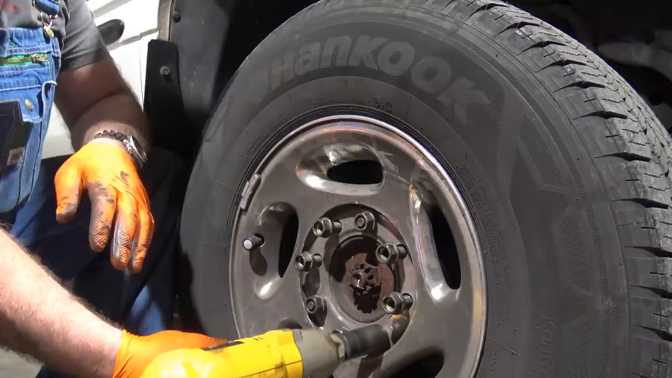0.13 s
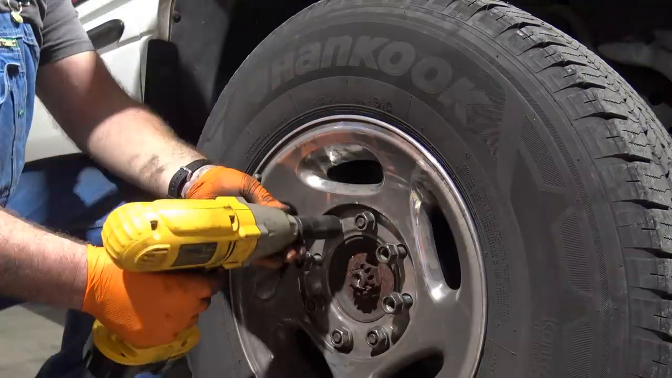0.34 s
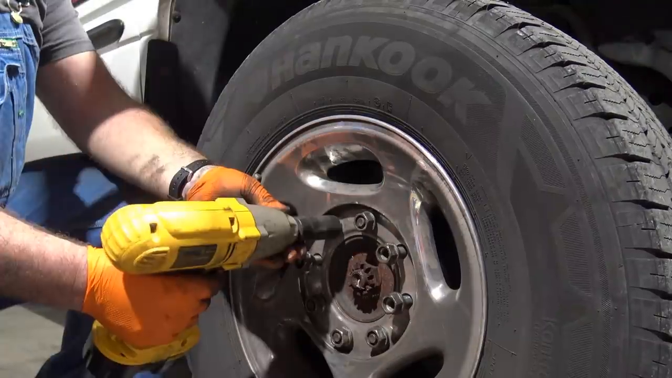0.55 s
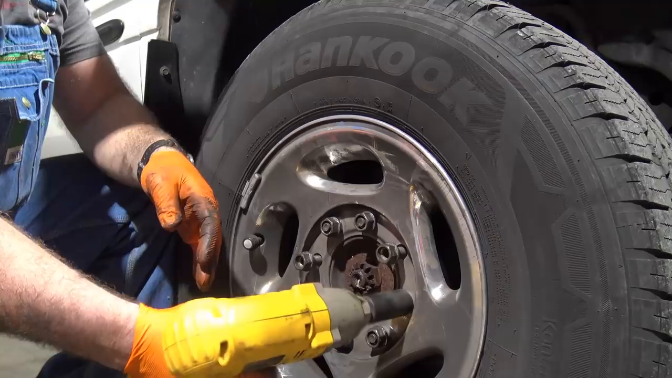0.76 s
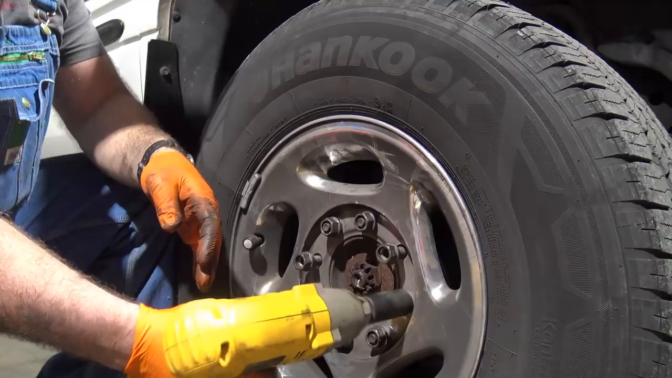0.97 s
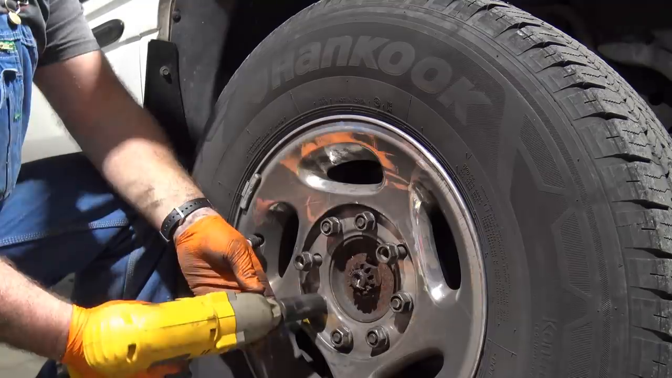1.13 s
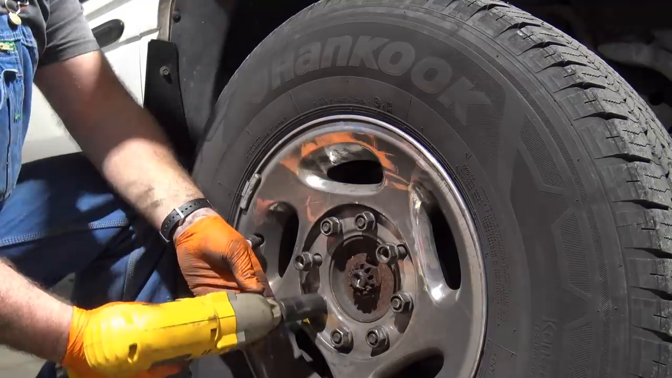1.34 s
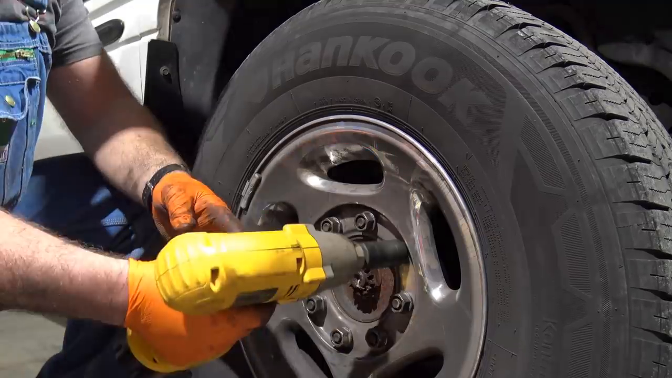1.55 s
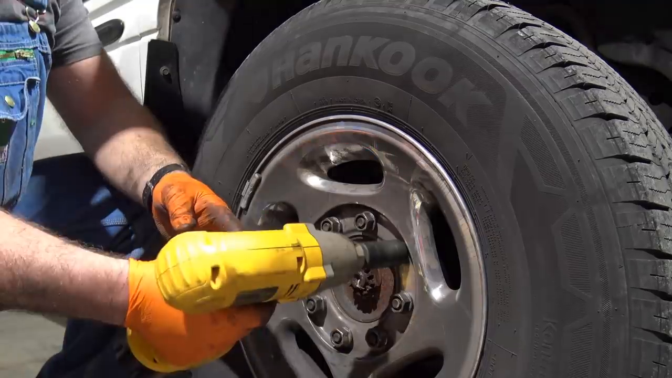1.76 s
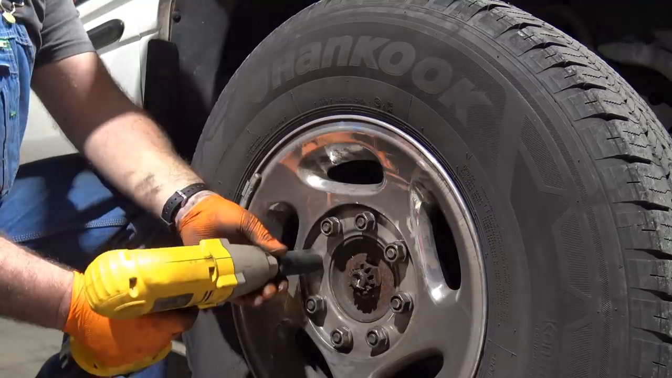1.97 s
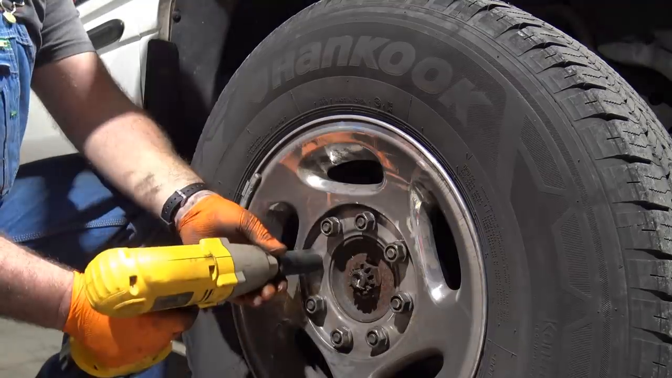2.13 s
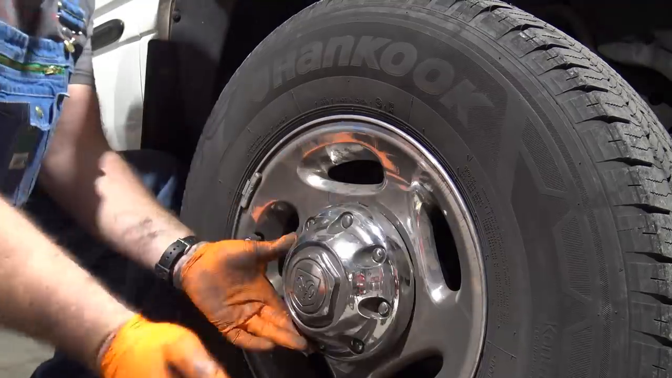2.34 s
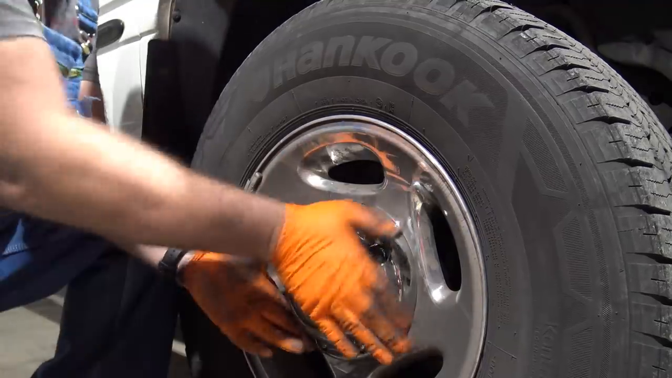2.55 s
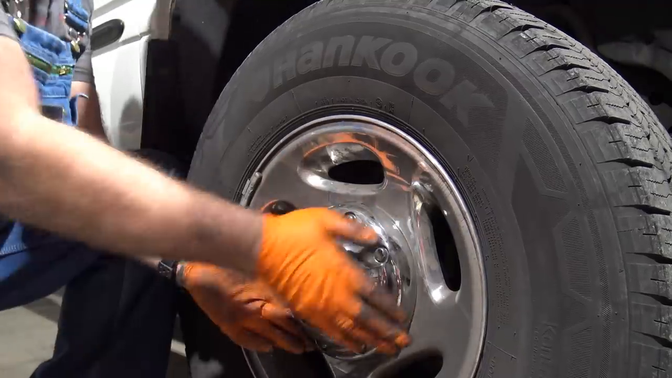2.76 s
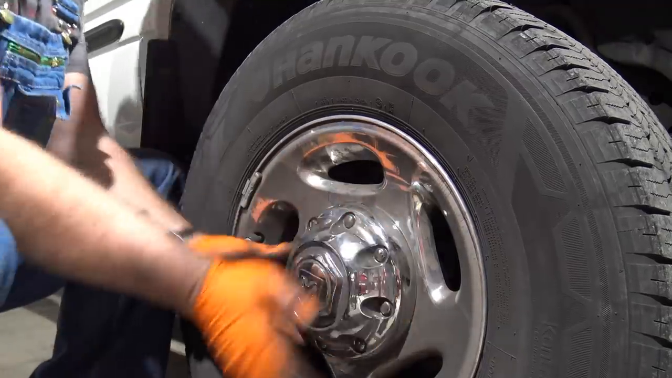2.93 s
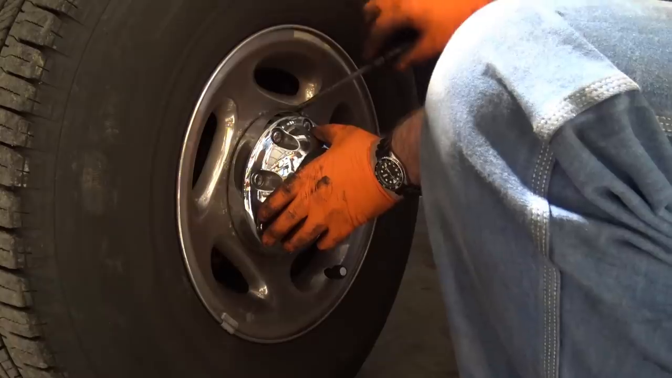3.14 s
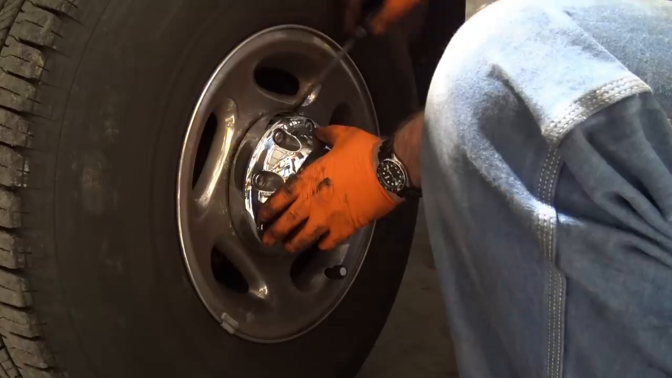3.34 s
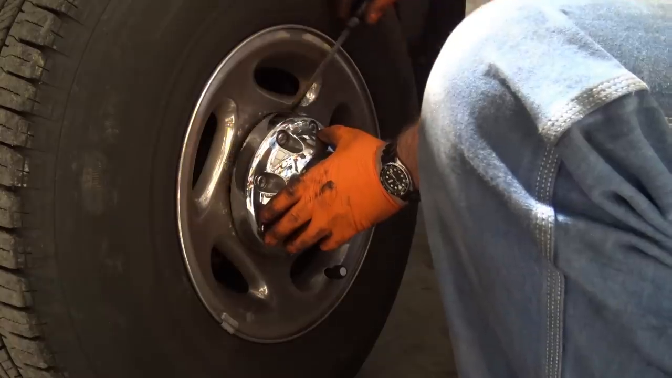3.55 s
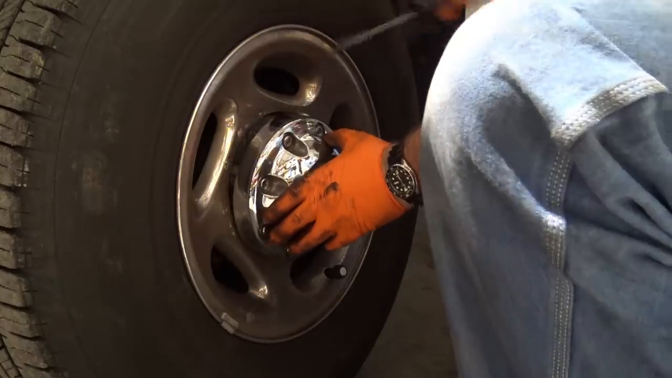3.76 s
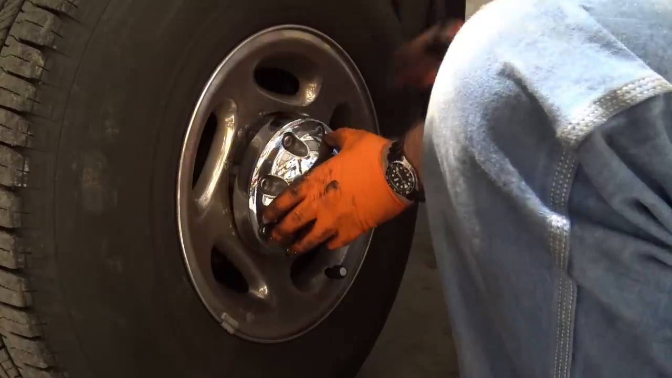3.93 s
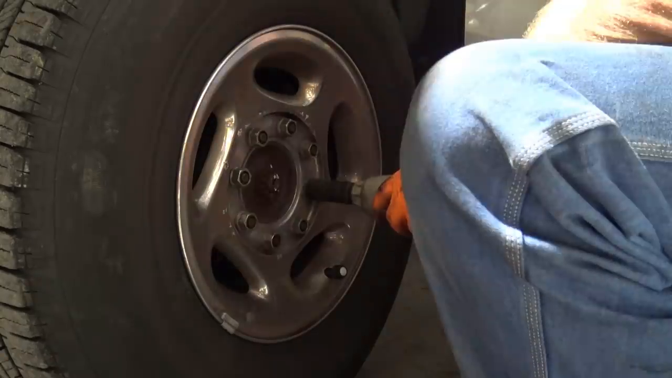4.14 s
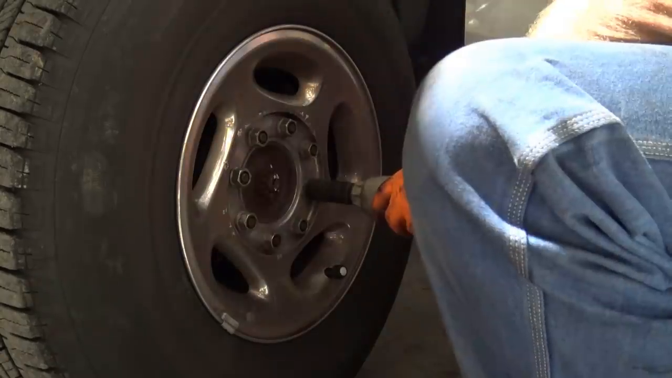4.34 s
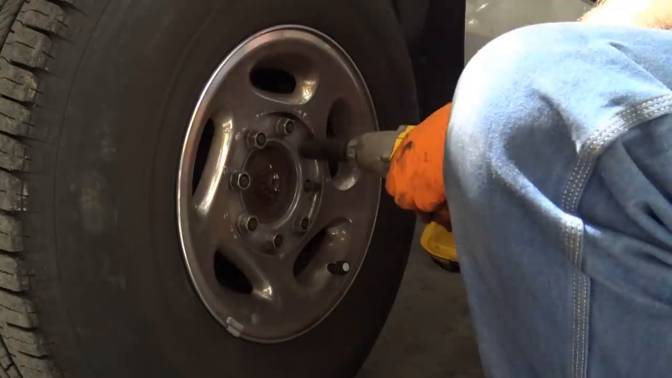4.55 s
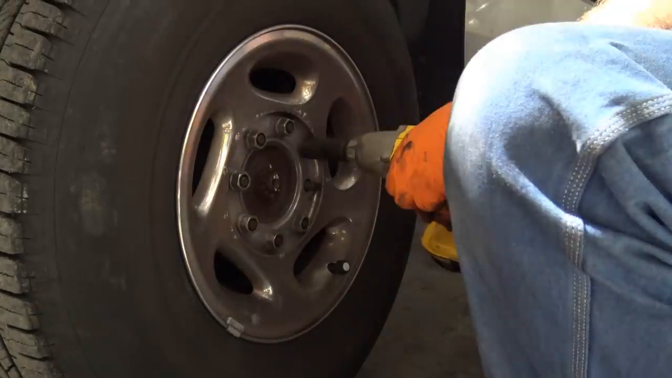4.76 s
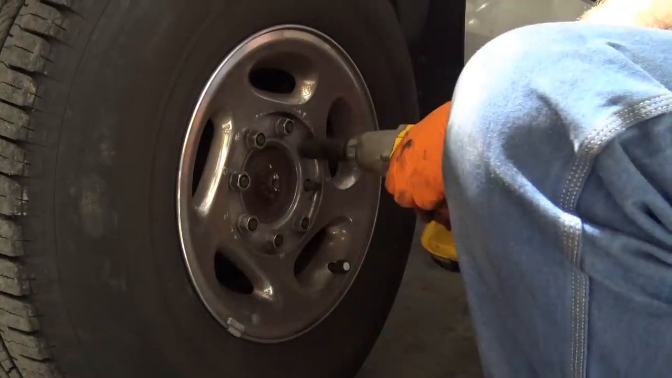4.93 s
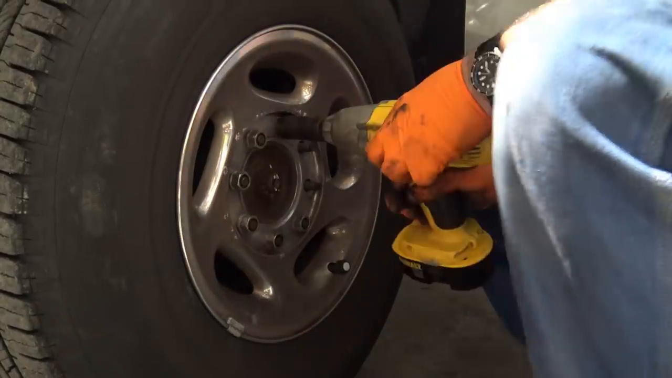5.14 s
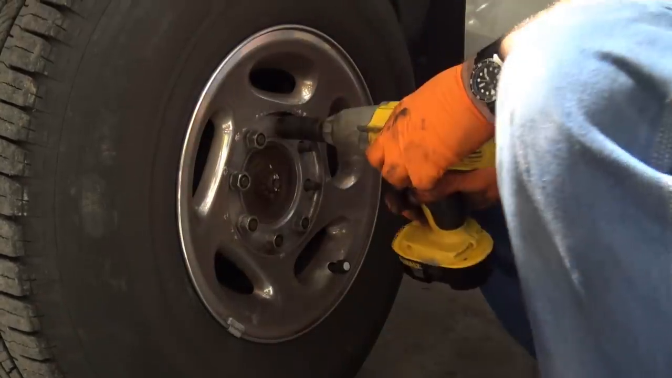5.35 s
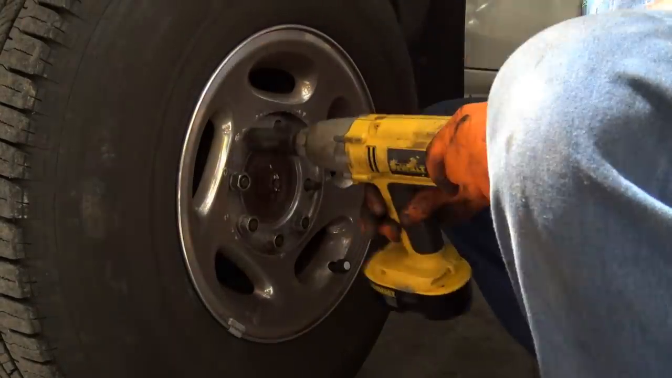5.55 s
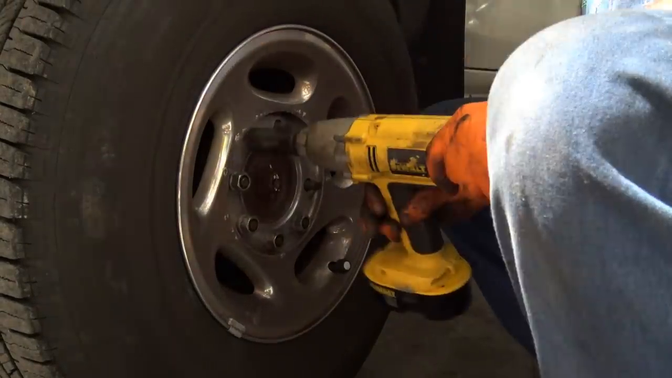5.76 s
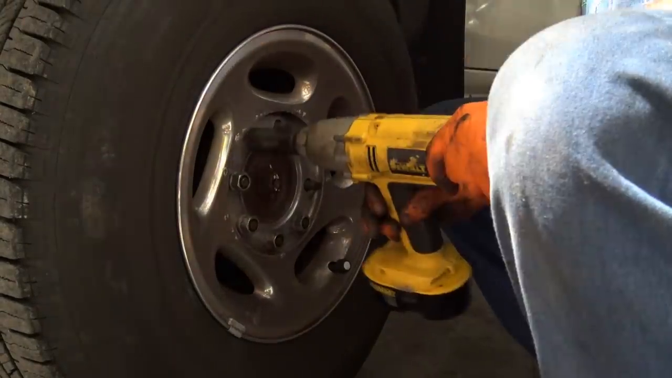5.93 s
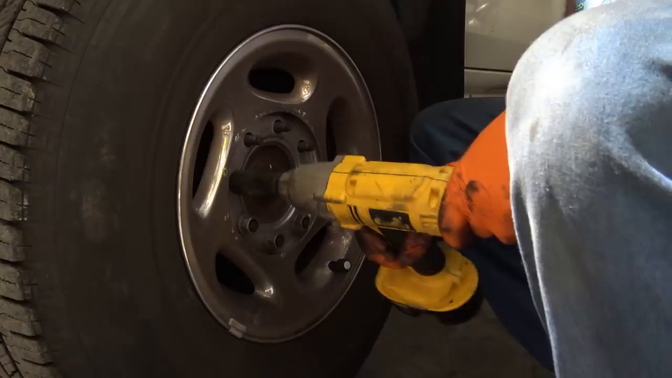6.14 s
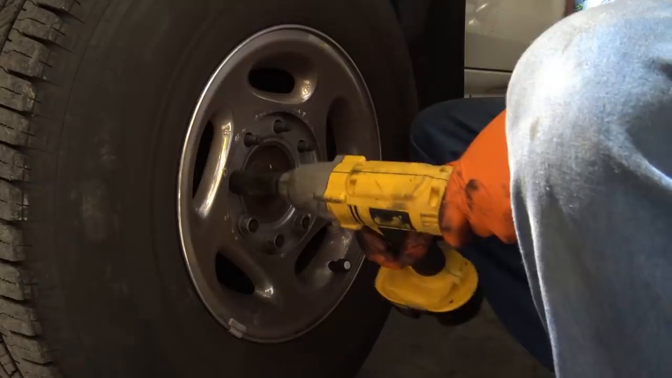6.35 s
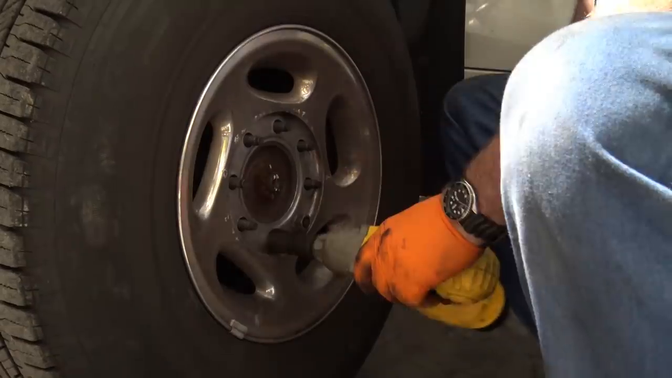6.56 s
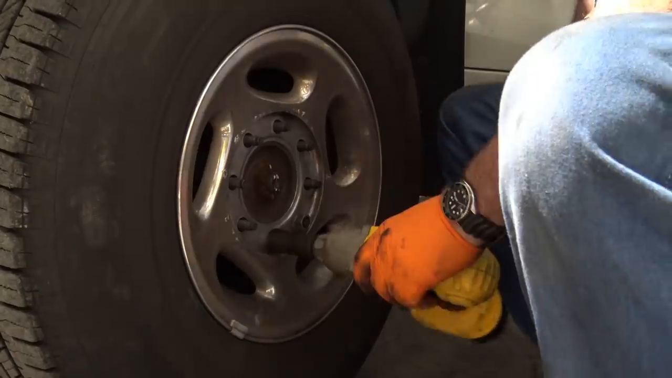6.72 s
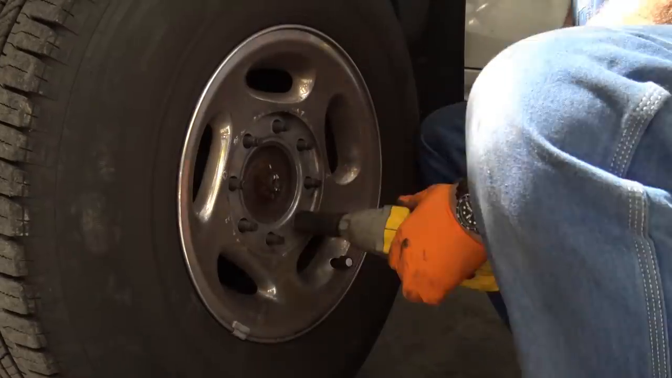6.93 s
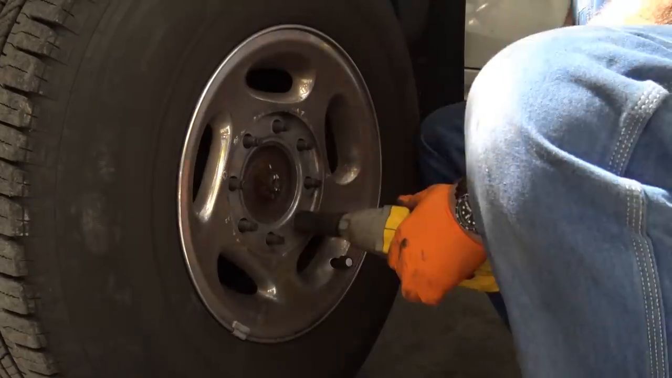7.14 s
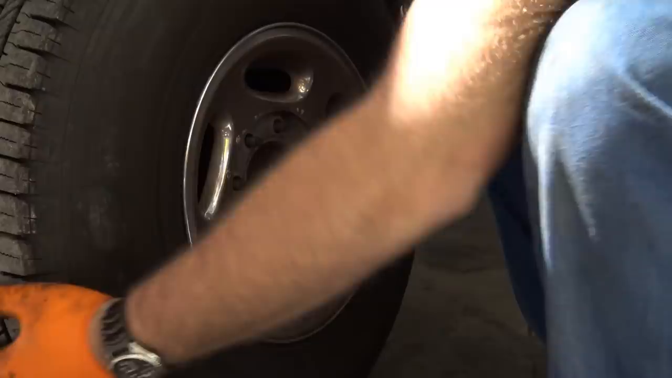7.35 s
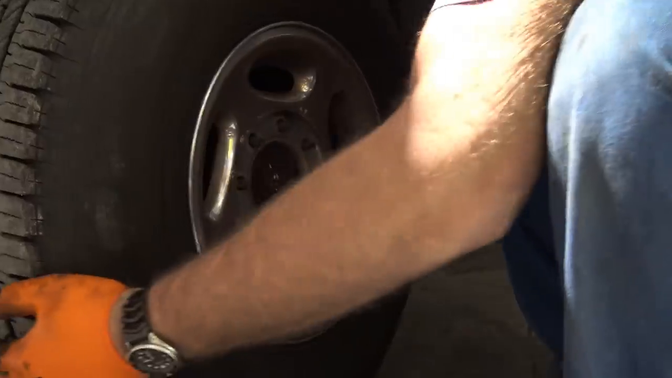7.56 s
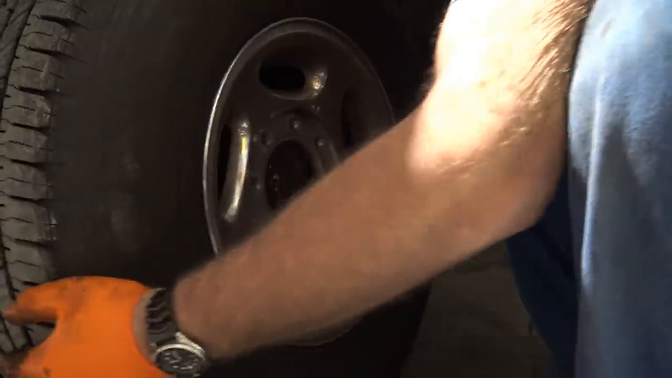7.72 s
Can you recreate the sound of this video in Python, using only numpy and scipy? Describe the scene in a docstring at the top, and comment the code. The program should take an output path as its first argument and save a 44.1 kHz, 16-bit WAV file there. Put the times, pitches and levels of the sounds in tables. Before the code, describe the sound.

A cordless impact wrench rattles furiously at the microphone, about thirty-seven blows a second, with cracking noise, a loose socket's clatter and short steel ringing. The run cuts off, a hand smacks a metal cap into place, and a lever clicks and pops under another cap over a faint low hum. Hammering cuts back in brighter and thinner, drops in level at the end, and leaves only a muffled rub with bumps.

```python
"""Impact wrench on a truck wheel

A cordless impact wrench hammers lug nuts in abruptly joined bursts: noise cracks and shudders, decaying steel modes.
Between runs a hub cap is slapped on and another pried off: shaped noise contacts excite paired, beating modes.
Near the end something is shifted with a rub and dull bumps, over quiet air noise and a wavering machine hum.
Synthetic echoes of a work bay answer wrench and cap; the close microphone overloads on the blows."""
import sys
import numpy as np
from scipy import signal
from scipy.fft import rfft, irfft
from scipy.io import wavfile
from scipy.ndimage import uniform_filter1d

SR = 44100
rng = np.random.default_rng(int(sys.argv[2]) if len(sys.argv) > 2 else 0)


def digitize_waveform(pressure):
    """Quantize a signal to 16-bit integers and store it at the path in sys.argv[1].

    Rows of a 2-D input are taken as channels; values are limited to [-1, 1].
    """
    field = np.atleast_2d(pressure).T
    bounded = np.clip(field, -1, 1)
    quanta = np.round(bounded * 32767).astype(np.int16)
    wavfile.write(sys.argv[1], SR, quanta)


N = 343539  # samples

# Levels in colour and mode tables are relative.
# One burst per nut, lasting until the next cuts in:
# (first blow [s], blow rate [Hz], level [dB], wheel resonance [Hz], bass boost [dB])
NUTS = [ (0.0169, 36.31, 2, 1260, 5), (0.3499, 37.02, .5, 3500, 1.5), (.763, 36.31, 0.35, 1900, 4),
        (1.1444, 36.97, -0.1, 1860, 3), (1.506, 36.58, -0.54, 1300, 3.5), (1.896, 36.93, -0.3, 700, 3),
        (4.083, 37.23, 0.34, 2100, 0), (4.642, 36.85, 1.1, 910, -3.5), (5.1179, 36.55, -0.6, 1480, -6.5),
        (5.646, 37.14, 0.7, 3530, -1), (6.1105, 36.89, .5, 483, -1.5), (6.5506, 36.46, 1.1, 2759, -6),
        (6.9922, 36.8, -10.5, 4900, 3.5)]
# Unbroken runs of hammering:
# (start [s], end [s], treble tilt [dB/octave well above 4 kHz], ring [dB], knock of the socket's play [dB])
RUNS = [(0, 2.325, 0.36, -38.5, -10), (4.081, 6.966, -0.2, -34.5, -9), (6.975, 7.424, 1, -34.5, -2)]
# Contacts after every blow, first the hammer's rebound, then the loose socket's rattle as the hammer winds up:
# (delay [s], delay spread [s], level [dB], level spread [dB])
AFTER_BLOW = [(.008, 0.0017, -20, 5), (.019, .0013, -13.5, 2.5)]
# Colour of a hammer blow: (frequency [Hz], level [dB])
BLOW_COLOUR = [(30, -32), (100, -18), (250, -10), (350, -9.5), (520, -10.3), (660, -4.5), (1200, -2),
               (1650, -2.5), (2000, -1), (3300, 0), (4200, -4.5), (7000, -10.5), (11400, -12.5),
               (16000, -18.5)]
# Modes of socket and steel wheel: (frequency [Hz], level [dB], t60 [s])
STEEL_MODES = [(333.3, -13.5, .2), (660, -4, 0.19), (855, 2.5, 0.16), (1069, -4, 0.19), (1984, 1.5, 0.055),
               (2458, -3.5, 0.11), (2965, 2.5, .15), (3308, 4, .07), (3495, 2.5, 0.12), (4615, 0.5, 0.092),
               (7400, -9, .015), (11400, -4, 0.013)]
# A hand slaps the cap on and it rattles into its seat:
# (time [s], level [dB], rise [s], fade [s], main resonance [Hz])
SLAPS = [(2.5562, -6, .0005, .006, 2940), (2.571, 1, .0009, .003, 600), (2.5753, .5, .0004, .0022, 2900),
         (2.604, -23.5, .01, .04, 3000), (2.619, -22, .004, 0.011, 450)]
# A lever scrapes and clicks under the cap's rim:
# (time [s], level [dB], rise [s], fade [s], main resonance [Hz])
PRIES = [ (3.056, -37.5, 0.00027, 0.048, 1510), (3.189, -47, 0.0094, .012, 1650),
         (3.274, -43.5, .012, 0.068, 362), (3.400, -30, 0.021, .012, 384), (3.413, -18, .011, .007, 1090),
         (3.563, -31, .005, 0.015, 3600), (3.572, -34.5, 0.0082, .02, 1600),
         (3.7004, -15, 0.0022, 0.0098, 560)]
# Colour of a knock on the cap: (frequency [Hz], level [dB])
KNOCK_COLOUR = [(30, -38), (100, -15), (250, -11), (400, 3), (900, -1.5), (1800, -2.5), (3000, -0.5),
                (4500, -9.5), (16000, -14.5)]
# Modes of the hub cap: (frequency [Hz], level [dB], t60 [s])
CAP_MODES = [(297, -2, .23), (373, 3, 0.17), (567, -5, 0.14), (1120, -5, .17), (1145, -4.5, .17),
             (1308, 3, 0.096), (1720, -3, 0.22), (2000, -8, .15), (2310, -8, .15), (2480, -14, .12),
             (2900, -3.5, 0.4), (3190, -11, .3), (3510, -16, .15)]
# Bumps during the rub: (time [s], level [dB], main resonance [Hz])
BUMPS = [(7.58, -34.5, 150), (7.658, -47, 1830), (7.749, -38, 760)]
# Colour of the shifted thing: (frequency [Hz], level [dB])
SHIFTED_COLOUR = [(30, -5), (130, 9), (350, 7.5), (850, -10), (1300, -6.5), (2000, -7), (2900, -17),
                  (3300, -8), (3900, -25), (4500, -15), (5200, -33), (5750, -16), (6500, -35), (16000, -50)]
# Echo colour of the work bay: (frequency [Hz], level [dB])
BAY_COLOUR = [(60, 9.5), (400, 9), (1000, 2.5), (3200, 3), (5000, 5.5), (8000, 0), (16000, 2.5)]
# Echo decay of the work bay: (frequency [Hz], t60 [s])
BAY_T60 = [(100, 0.58), (500, 0.46), (3000, 0.61), (6000, 0.53), (15000, 0.27)]
# Background, steady within each stretch of work: (start [s], air [dB], machine hum [dB])
STRETCHES = [(0, -63.5, -63), (3.056, -53.5, -54.5), (4.081, -68, -79), (7.48, -81.5, -80)]
# Colour of the air: (frequency [Hz], level [dB])
AIR_COLOUR = [(30, -14.5), (80, -6.5), (140, -6.5), (300, -11), (700, -15.5), (3000, -18), (6000, -26),
              (15000, -33)]

CUT_IN_S = .01  # a burst starts this long before its first blow
NUT_BOOST_DB = 3.5  # height of the wheel resonance
CRACK_POWER = 1.23  # the crack grows faster than the force, so light contacts sound duller
# just after each blow the socket takes up its play on the nut
PLAY_S, PLAY_SPREAD_S, PLAY_SPREAD_DB = .003, .001, 4

# a crisp contact excites the cap more evenly; each doubling of its rise time favours the main resonance
CRISP_RISE_S, CRISP_BOOST_DB, BOOST_DB_PER_DOUBLING = .001, 8.5, 2
SLAP_RING_DB, SLAP_ROOM_DB, SLAP_DULL_HZ = -38, -7.5, 3000
PRY_RING_DB, PRY_ROOM_DB, PRY_DULL_HZ = -7.5, -20.5, 5200

RUB_START_S, RUB_DB, RUB_RISE_S, RUB_FADE_S = 7.571, -46, 0.0032, 0.16
RUB_HZ, RUB_BOOST_DB = 1800, 6
BUMP_RISE_S, BUMP_FADE_S, BUMP_BOOST_DB, BUMP_DULL_HZ = .007, .013, 18, 1900

HUM_HZ = 191
TOP_HZ = 15900  # nothing sounds above this


def wrench(crack_db=-1, body_db=-13, room_db=-8.0, modal_db=4):
    """Each burst: a sharp crack, the longer shudder of the wheel, ringing steel and the echo."""
    out = np.zeros(N)
    lead_s = .3  # the hammer is already running when a burst cuts in
    for start, end, nut, (treble_db, ring_db, play_db) in bursts():
        first, rate_hz, level_db, wheel_hz, bass_db = nut
        t = seconds(lead_s + end - start)
        force = hammer(t, lead_s + first - start, rate_hz, play_db)

        def shape(f):
            modes_db = modal_db * peaks(f, STEEL_MODES, 0.021)
            wheel_db = curve(f, BLOW_COLOUR) + modes_db + NUT_BOOST_DB * bell(f, wheel_hz, 0.16)
            return wheel_db + bass_db * bell(f, 190, 0.78) + treble_db * np.log2(1 + f / 4000)

        # the crack carries little bass, the shudder little treble
        crack = clatter(force ** CRACK_POWER, fade_s=0.002, alike=0.13)
        crack = colour(crack, lambda f: shape(f) - 10 * np.log10(1 + (500 / f) ** 2))
        body = clatter(force, fade_s=0.0067, alike=0.42)
        body = colour(body, lambda f: shape(f) + dulling_db(f, 5500))
        ring = through(force, ringing(STEEL_MODES, seconds(.25), detune=0.0024))
        direct = undb(crack_db) * crack + undb(body_db) * body + undb(ring_db) * ring
        # every position of the tool has its own echo
        burst = direct + undb(room_db) * through(direct, bay())
        add(out, undb(level_db) * burst[int(lead_s * SR):], start)
    return out


def bursts():
    """Share each run among its nuts: the first starts with the run, later ones just before their first blow."""
    for begin, finish, *run in RUNS:
        nuts = [nut for nut in NUTS if begin <= nut[0] + CUT_IN_S < finish]
        joins = [begin] + [nut[0] - CUT_IN_S for nut in nuts[1:]] + [finish]
        for start, end, nut in zip(joins, joins[1:], nuts):
            yield start, end, nut, run


def hammer(t, first, rate_hz, play_db, scatter_db=1.55):
    """Force on the anvil: blows from two hammer lugs in turn, each followed by other, mostly lighter contacts."""
    turn = np.arange(-int(first * rate_hz), int((t[-1] - first) * rate_hz) + 1)
    early, strong = rng.standard_normal((64, 4, 2))[:len(turn)].T
    lug_offset_s = .0003 * (turn % 2 - .5)
    blows = first + turn / rate_hz + .00022 * early[0] + lug_offset_s
    contacts = [(blows, scatter_db * strong[0])]
    play = (PLAY_S, PLAY_SPREAD_S, play_db, PLAY_SPREAD_DB)
    for follower, time_chance, level_chance in zip([play] + AFTER_BLOW, early[1:], strong[1:]):
        delay_s, spread_s, db, spread_db = follower
        contacts.append((blows + delay_s + spread_s * time_chance, db + spread_db * level_chance))
    force = np.zeros(len(t))
    for when, db in contacts:
        inside = (when > 0) & (when < t[-1])
        force[(when[inside] * SR).astype(int)] += undb(db[inside])
    return force


def clatter(force, fade_s, alike):
    """Dense, quickly damped vibration after each contact: partly the same every time, partly new."""
    fade = np.exp(-seconds(.05) / fade_s)
    alike = np.clip(alike, 0, 1)
    same = through(force, fade * rng.standard_normal(len(fade)))
    envelope = np.sqrt(np.abs(through(force ** 2, fade ** 2)))
    fresh = envelope * rng.standard_normal(len(force))
    return np.sqrt(alike) * same + np.sqrt(1 - alike) * fresh


def hub_cap(knocks, ring_db, room_db, dull_hz, modal_db=9):
    """Slaps or prying clicks; where the cap is struck decides which resonance speaks most."""
    out, t, room = np.zeros(N), seconds(0.83), bay()
    # a flat hand damps the cap, a prying tip leaves it free
    free = min(undb(ring_db + 13.0), 1)
    for start, level_db, rise_s, fade_s, main_hz in knocks:
        softness = np.log2(rise_s / CRISP_RISE_S)
        boost_db = CRISP_BOOST_DB + BOOST_DB_PER_DOUBLING * softness

        def emphasis(f):
            return boost_db * bell(f, main_hz, 0.27) + dulling_db(f, dull_hz)

        def shape(f):
            return curve(f, KNOCK_COLOUR) + emphasis(f) + free * modal_db * peaks(f, CAP_MODES, 0.021)

        knock = colour(contact(t, rise_s, fade_s), shape)
        modes = [(hz, db + emphasis(hz) - boost_db / 2, t60) for hz, db, t60 in CAP_MODES]
        # the cap is not quite round, so its modes come in beating pairs
        ring = ringing(modes, t, detune=.003) + .25 * ringing(modes, t, detune=.008)
        add(knock, undb(ring_db) * ring / 2, rise_s)
        add(out, undb(level_db) * (knock + undb(room_db) * through(knock, room)), start)
    return out


def handling():
    """Something is shifted as the hand reaches away: a faintly metallic, dying rub with dull bumps."""
    out, t = np.zeros(N), seconds(.5)
    rub = contact(t, RUB_RISE_S, RUB_FADE_S)
    rub = colour(rub, lambda f: curve(f, SHIFTED_COLOUR) + RUB_BOOST_DB * bell(f, RUB_HZ, .6))
    add(out, undb(RUB_DB) * rub, RUB_START_S)
    for start, level_db, main_hz in BUMPS:
        def shape(f):
            boost_db = BUMP_BOOST_DB * bell(f, main_hz, 0.7)
            return curve(f, SHIFTED_COLOUR) + boost_db + dulling_db(f, BUMP_DULL_HZ)

        bump = colour(contact(t, BUMP_RISE_S, BUMP_FADE_S), shape)
        add(out, undb(level_db) * bump, start)
    return out


def contact(t, rise_s, fade_s):
    """Contact noise that swells and dies away."""
    swell = np.minimum(t / rise_s, 1) ** 2
    fade = np.exp(-np.maximum(t - rise_s, 0) / fade_s)
    return rng.standard_normal(len(t)) * swell * fade


def bay(build_s=0.026):
    """Echo of the work bay, of unit energy: noise that builds up gradually and loses its top first."""
    t = seconds(0.9)
    f, when, cells = signal.stft(rng.standard_normal(len(t)), SR)
    decay = np.exp(-np.log(1000) * when / curve(f + 1, BAY_T60)[:, None])
    cells = cells * decay * undb(curve(f + 1, BAY_COLOUR))[:, None]
    tail = signal.istft(cells, SR)[1][:len(t)] * (1 - np.exp(-t / build_s)) ** 2
    return tail / np.linalg.norm(tail)


def background():
    """Quiet coloured air noise and a distant machine's hum, wavering in level and phase."""
    t = np.arange(N) / SR
    when, *columns = np.transpose(STRETCHES)
    air_db, hum_db = (c[np.searchsorted(when[1:], t)] for c in columns)
    air = colour(rng.standard_normal(N), lambda f: curve(f, AIR_COLOUR))
    smooth = uniform_filter1d(rng.standard_normal(N), size=2000)
    waver = unit(uniform_filter1d(smooth, size=2000))
    hum = unit(np.sin(2 * np.pi * HUM_HZ * t + .4 * waver[::-1]))
    return undb(air_db) * air + undb(hum_db + 1.5 * waver) * hum


def ringing(modes, t, detune):
    """Decaying modes, each randomly detuned by a fraction of its frequency and random in sign."""
    chance = rng.standard_normal((len(modes), 2))
    out = 0
    for (hz, db, t60), (pitch, sign) in zip(modes, chance):
        tone = np.sin(2 * np.pi * hz * (1 + detune * pitch) * t)
        out = out + undb(db - 60 * t / t60) * tone * np.sign(sign)
    return out


def peaks(f, modes, octaves):
    """Height 1 at each mode, falling between them: a body passes its own pitches best."""
    return np.max([bell(f, mode[0], octaves) for mode in modes], axis=0)


def bell(f, hz, octaves):
    """A resonance bump of height 1."""
    return 1 / (1 + (np.log2(f / hz) / octaves) ** 2)


def dulling_db(f, hz):
    """First-order treble loss, 3 dB at hz."""
    return -10 * np.log10(1 + (f / hz) ** 2)


def curve(f, points):
    """Join (frequency [Hz], value) points on a log-frequency axis."""
    hz, value = np.transpose(points)
    return np.interp(np.log(f), np.log(hz), value)


def colour(x, db_at):
    """Minimum-phase filter; gain in dB from db_at(frequency), normalised to rms 1 over frequency."""
    size = 4096
    gain = unit(undb(db_at(np.maximum(np.fft.rfftfreq(size, 1 / SR), 1))))
    # folding the cepstrum makes the response causal
    cepstrum = irfft(np.log(gain))
    cepstrum[1:size // 2] *= 2
    cepstrum[size // 2 + 1:] = 0
    return through(x, irfft(np.exp(rfft(cepstrum))))


def through(x, response):
    """Convolve, keeping the length."""
    return signal.fftconvolve(x, response)[:len(x)]


def add(out, x, start):
    """Mix x into out from start [s] on."""
    i = max(int(start * SR), 0)
    out[i:i + len(x)] += x[:max(len(out) - i, 0)]


def undb(db):
    """Amplitude from dB."""
    return 10 ** (np.asarray(db) / 20)


def unit(x):
    """Scale to rms 1."""
    return x / np.sqrt(np.mean(x ** 2))


def seconds(length):
    """Time axis [s] of the given length [s]."""
    return np.arange(int(length * SR)) / SR


def scene():
    """Wrench, hub cap, handling and background, as one channel."""
    slaps = hub_cap(SLAPS, SLAP_RING_DB, SLAP_ROOM_DB, SLAP_DULL_HZ)
    pries = hub_cap(PRIES, PRY_RING_DB, PRY_ROOM_DB, PRY_DULL_HZ)
    return (wrench() + slaps + pries + handling() + background())[None]


def record(dry):
    """Peaks beyond full scale are clipped, then everything above TOP_HZ is removed."""
    clipped = np.clip(dry, -1, 1)
    top_cut = signal.ellip(10, .1, 70, TOP_HZ, fs=SR, output="sos")
    return signal.sosfilt(top_cut, clipped)


dry = scene()
out = record(dry)
digitize_waveform(out)
```